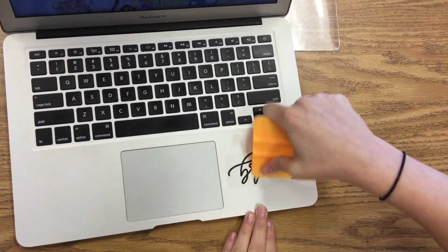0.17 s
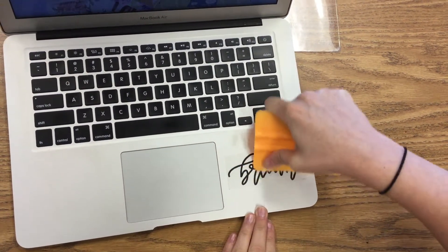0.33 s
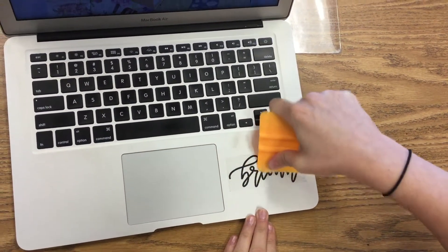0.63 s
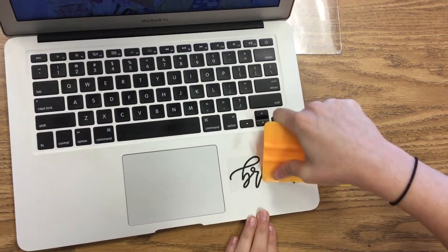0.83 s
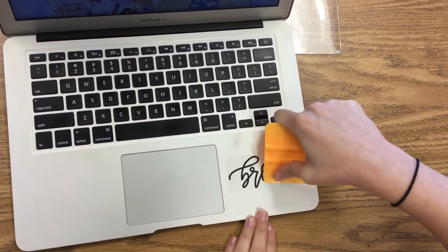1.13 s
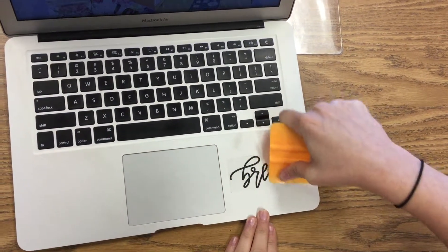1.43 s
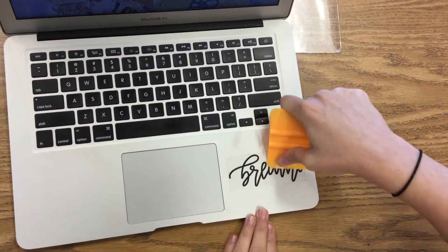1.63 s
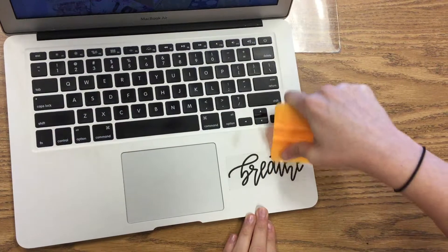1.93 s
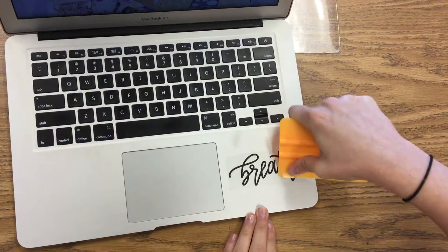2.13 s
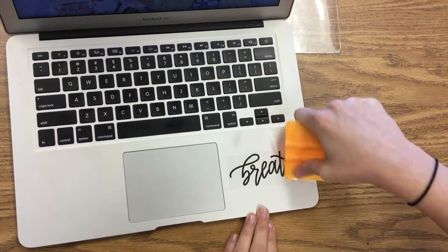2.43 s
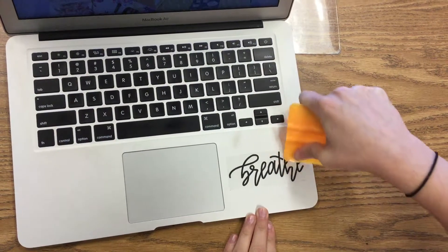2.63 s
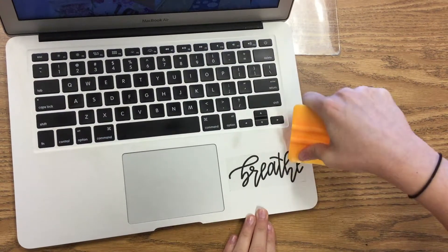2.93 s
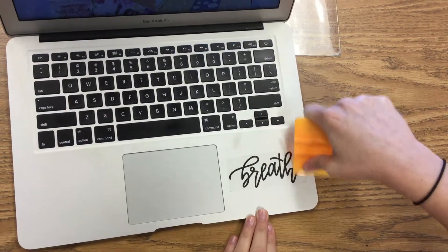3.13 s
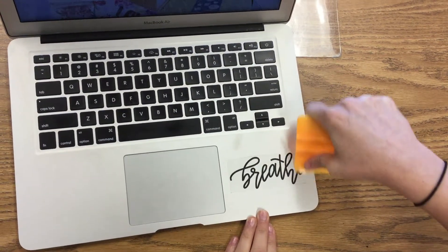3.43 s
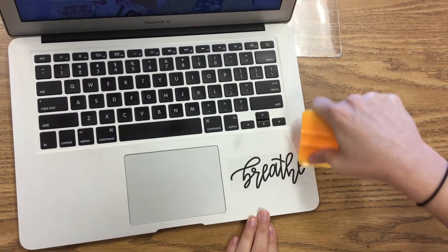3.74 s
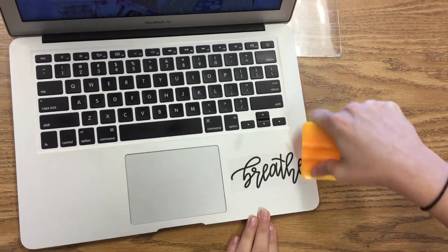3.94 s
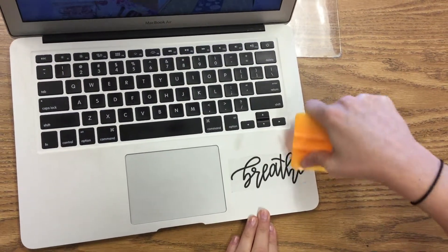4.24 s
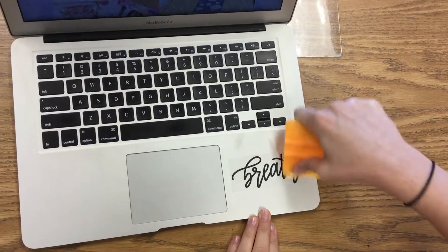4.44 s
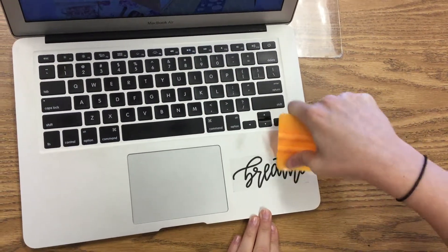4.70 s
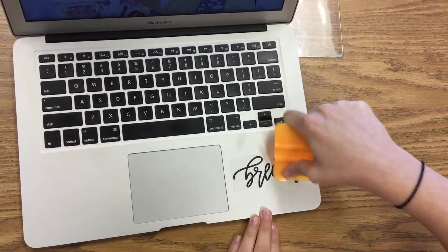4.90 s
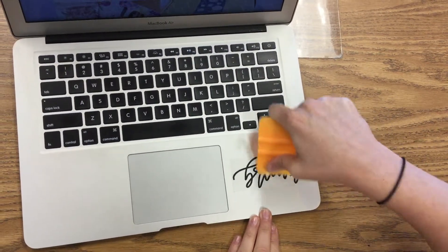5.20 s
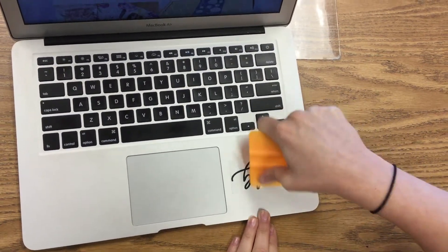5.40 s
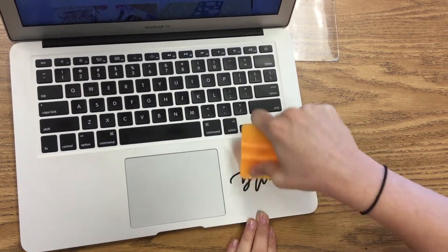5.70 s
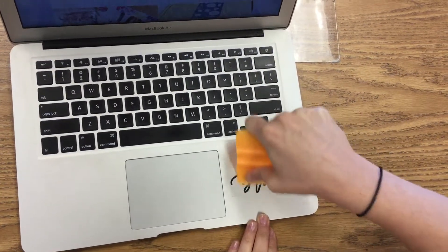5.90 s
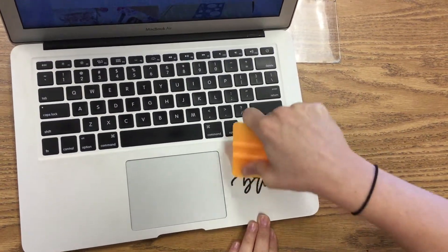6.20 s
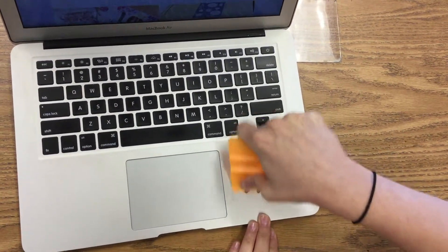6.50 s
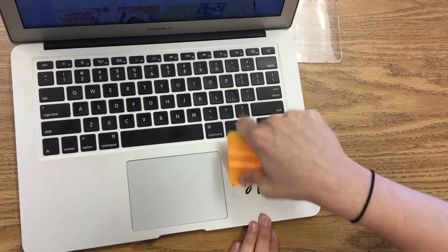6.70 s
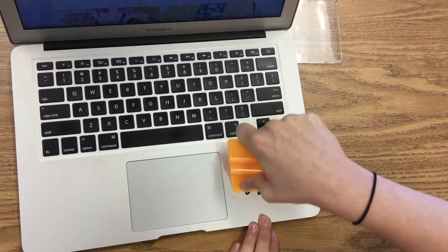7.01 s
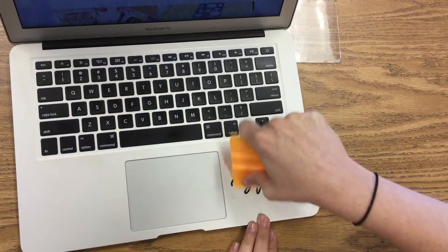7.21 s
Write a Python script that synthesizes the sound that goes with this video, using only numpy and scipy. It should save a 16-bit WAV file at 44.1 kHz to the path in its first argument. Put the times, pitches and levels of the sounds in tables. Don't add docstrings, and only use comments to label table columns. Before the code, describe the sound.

In a small room with low, wavering ventilation rumble, a plastic card edge rubs tape on a laptop's metal case. Short dry swishes alternate back and forth. Early on, most return strokes rock the case into a hollow knock on the desk, and the tape ticks occasionally. Later the knocks fade away and the scraping grows quicker and harsher. A single microphone hangs close above the desk.

```python
import sys
import numpy as np
from scipy import signal
from scipy.fft import rfft, irfft
from scipy.io import wavfile
from scipy.ndimage import uniform_filter1d

SR = 44100
rng = np.random.default_rng(int(sys.argv[2]) if len(sys.argv) > 2 else 0)


def how_loud(loudness_db):
    steps = np.asarray(loudness_db, float) / 20
    return 10 ** steps


def digitize_waveform(pressure):
    field = np.atleast_2d(pressure).T
    bounded = np.clip(field, -1, 1)
    quanta = np.round(bounded * 32767).astype(np.int16)
    wavfile.write(sys.argv[1], SR, quanta)


N = 324128

PAD_S = .014
LONGEST = SR // 6


def level(x, db):
    return x * how_loud(db) / np.sqrt(np.mean(x ** 2))


def band(x, hz, width_hz):
    b, a = signal.iirpeak(min(hz, .45 * SR), hz / width_hz, fs=SR)
    return signal.lfilter(b, a, x)


def lowpass(x, hz):
    b, a = signal.butter(1, hz, fs=SR)
    return signal.lfilter(b, a, x)


def decay(t, t60_s):
    return how_loud(-60 * t / t60_s)


def add(out, start_s, x):
    i = int(start_s * SR)
    out[max(i, 0):i + len(x)] += x[max(-i, 0):N - i]


def walk(size, rate_hz):
    hold = int(SR / rate_hz)
    steps = np.repeat(rng.standard_normal(size // hold + 1), hold)
    return 1.75 * uniform_filter1d(uniform_filter1d(steps, hold), hold)[:size]


def coloured(spectrum):
    hz, db = np.transpose(spectrum)
    bins_hz = np.arange(1, N // 2 + 2) * SR / N
    gain = how_loud(np.interp(np.log(bins_hz), np.log(hz), db, -90, -90))
    return irfft(rfft(rng.standard_normal(N)) * gain, N)


def ventilation():
    # (frequency [Hz], width [Hz], level [dB])
    room_modes = [(53.7, 8.7, -2), (71.1, 11.8, -0.5), (103.95, 17.7, 1), (127.4, 18.3, 0.5),
                  (152.2, 16.2, -6), (184.4, 19, -4.5), (215.6, 16.2, -8), (256, 21, -14), (299, 27.5, -18),
                  (345.3, 25.3, -22.5), (367.4, 23, -26.5)]
    # (time [s], level [dB])
    swell = [(0.0, -48.5), (1.0, -52.5), (1.06, -47.5), (1.35, -52), (1.39, -45.5), (1.62, -53),
             (1.68, -48), (2.03, -52), (2.41, -50), (4.65, -49), (4.83, -53), (5.32, -50), (6.9, -51),
             (6.96, -55), (7.1, -48), (7.35, -49.5)]
    # (frequency [Hz], density [dB per Hz])
    air_spectrum = [(240, -31), (400, 3), (473, -2), (653, 2.5), (874, -4.5), (1450, -7.5), (1910, -16.5),
                    (2230, -15), (3120, -19), (4370, -17), (6920, -24), (8310, -21.5), (10100, -24),
                    (15600, -27.5)]
    rumble = np.zeros(N)
    for hz, width_hz, db in room_modes:
        once = band(rng.standard_normal(N), hz, 1.56 * width_hz)
        mode = level(band(once, hz, 1.56 * width_hz), db)
        rumble += mode * np.sqrt(width_hz / 15) * how_loud(1.37 * walk(N, 7))
    swell_db = np.interp(np.arange(N) / SR, *np.transpose(swell))
    rumble = level(rumble, 0) * how_loud(uniform_filter1d(swell_db, size=SR // 15) + 1.33)
    air = level(coloured(air_spectrum), -72.5)
    drone = lowpass(air, 900)
    hiss = air - drone
    return rumble + drone * how_loud(1.3 * walk(N, 9)) + hiss * how_loud(.7 * walk(N, 5))


def slips(size, lean, sharp):
    warp = np.log(.5) / np.log(np.clip(lean, .15, .85))
    speed = np.sin(np.pi * np.linspace(0, 1, size) ** warp).clip(0)
    grit_db = 1.8 * rng.exponential(size=LONGEST) + 0.86 * walk(LONGEST, 107.6)
    grit = rng.standard_normal(LONGEST) * how_loud(grit_db)
    return grit[:size] * np.tanh(0.54 * speed) ** sharp


def resonate(drive, modes, patchy_db=2.5):
    out = np.zeros(len(drive))
    for k, (hz, width_hz, db) in enumerate(modes):
        once = band(drive, hz * (1 + 0.016 * rng.standard_normal()), width_hz)
        steep = band(once, hz, 4.2 * width_hz)
        patchy = how_loud(db + patchy_db * walk(LONGEST, 48.1)[:len(drive)])
        out += (-1) ** k * steep * patchy / np.sqrt(width_hz / 400)
    return out


def stroke(start_s, end_s, db, lean, bright_db, hiss_db):
    # (until [s], modes (frequency [Hz], width [Hz], level [dB]))
    spots = [
        (1.9, [(3170, 450, -2.5), (3940, 400, 2.5), (4450, 300, 1), (5800, 420, 1), (7100, 600, -3), (8200, 500, 3), (9200, 600, -1), (11700, 1200, 6), (13200, 1200, -1), (14800, 1500, 5)]),
        (4.35, [(3560, 780, 9), (4480, 100, 3.5), (4920, 290, 3), (6240, 880, 3), (8230, 760, 3), (11650, 1300, 2.5), (12960, 440, -2.5), (14500, 1100, 4), (15100, 910, 1)]),
        (5.6, [(3150, 690, -2), (4320, 370, 2), (4900, 290, -7.5), (5550, 960, 0.5), (7400, 580, -3), (8300, 260, -2.5), (9100, 450, -2), (11600, 1500, -2), (14600, 2000, -0.5)]),
        (7.4, [(3320, 760, -2), (3670, 420, 3), (4350, 750, -4.5), (5250, 380, -2.5), (5730, 650, -3), (7300, 570, -5), (9140, 850, -2), (11650, 990, -5.5), (13100, 800, -9.5), (15300, 1100, -9)]),
    ]
    bright_above_hz, hiss_above_hz = 4700, 6900
    size = min(int((end_s - start_s + 2 * PAD_S) * SR), LONGEST)
    modes = next(spot for until_s, spot in spots if start_s < until_s)
    card = [(hz, width_hz, mode_db + (bright_db + 1.5) * (hz > bright_above_hz))
            for hz, width_hz, mode_db in modes if hz < hiss_above_hz]
    edge = [mode for mode in modes if mode[0] > hiss_above_hz]
    lean = .5 + 1.43 * (lean - .5)
    scrape = level(resonate(slips(size, lean, 1.14), card), db + 0.25)
    hiss = level(resonate(slips(size, lean + 0.0065, 1.25), edge), db + hiss_db)
    return scrape + hiss


def groan(start_s, end_s, db, hz, deep_db, lean):
    # (frequency [Hz], width [Hz], level [dB])
    panels = [(1730, 160, -10.5), (2150, 220, -4.5), (2500, 330, -8.5), (2840, 160, -9)]
    # (frequency [Hz], width [Hz], level [dB])
    deep_panels = [(1020, 150, -1.5), (1260, 420, -0.2), (1634, 290, -0.3)]
    size = min(int((end_s - start_s + PAD_S) * SR), LONGEST)
    under = resonate(slips(size, lean - .01, 1.0), [(hz, 140, 0)])
    others = resonate(slips(size, lean + 0.014, 0.7), panels)
    deep = resonate(slips(size, lean + .03, 0.48), deep_panels, patchy_db=4.0)
    return level(under, db - 4.0) + level(others, db - 4.5) + level(deep, db + deep_db + 0.11)


def sheet(x):
    t60_s, ring_db = 0.02, -4.0
    t = np.arange(N) / SR
    tail = rng.standard_normal(N) * how_loud(-60 * np.minimum(t / t60_s, 3))
    response = 1 + rfft(tail * how_loud(ring_db) / np.sqrt(np.sum(tail ** 2)))
    broad = uniform_filter1d(np.abs(response) ** 2, size=300 * N // SR)
    return irfft(rfft(x) * response / np.sqrt(broad), N)


def rubbing():
    # (start [s], end [s], level [dB],
    # brightness [dB], edge hiss share [dB])
    catches = [
        (5.68, 5.702, -55, -5, -4.5),
        (5.721, 5.737, -59.5, -7, -5.5),
        (4.891, 4.909, -69.5, 1, -3),
        (1.998, 2.014, -72, -16, 6),
        (7.266, 7.284, -67.5, -3, -16),
        (2.445, 2.5, -68, -9, -12),
        (1.846, 1.864, -75, -7, -10),
        (0, 0.0089, -72.5, -8, -7),
        (5.389, 5.408, -70, -10, -16),
    ]
    # (start [s], end [s], level [dB], hum over scrape [dB])
    pushes = [(0.074, 0.121, -73, 3), (0.329, 0.416, -73, 6.5), (0.646, .709, -70.5, 5),
              (0.973, 1.042, -83, 9.5), (1.266, 1.325, -73.5, 5.5), (1.598, 1.663, -71.5, 1.5),
              (1.97, 2.017, -68.5, -2.5), (2.264, 2.311, -71.5, -5), (2.599, 2.648, -67.5, -4),
              (2.911, 2.962, -72, -5), (3.22, 3.261, -70, -2), (3.483, 3.534, -77, -2),
              (3.766, 3.832, -72.5, -3.5), (4.027, 4.082, -73.5, -3), (4.241, 4.33, -82, 0.5),
              (4.477, 4.541, -70.5, -2), (4.751, 4.792, -80, -1.5), (4.982, 5.045, -76.5, 1),
              (5.231, 5.306, -78.5, 2.5), (5.473, 5.547, -72, 0.7), (5.717, 5.779, -65, -2.5),
              (5.964, 6.041, -74, -1.5), (6.2, 6.258, -66.5, -4.5), (6.424, 6.477, -70, 0),
              (6.632, 6.703, -72, -2.1), (6.883, 6.946, -68.5, -3.5), (7.14, 7.181, -73.5, -2)]
    # (start [s], end [s], level [dB], hum over scrape [dB])
    pulls = [(.216, .295, -71.5, 5.5), (.502, .569, -68, 6), (.822, .876, -75, 8.5),
             (1.143, 1.197, -72.5, 6), (1.443, 1.515, -72, 6), (1.78, 1.852, -76, 6),
             (2.064, 2.184, -74.5, 1.5), (2.408, 2.51, -74, 1.5), (2.734, 2.803, -71.5, -1.1),
             (3.058, 3.121, -69.5, .6), (3.344, 3.415, -70, -1.7), (3.635, 3.688, -76.5, 3),
             (3.901, 3.959, -67.5, -1.8), (4.151, 4.213, -68.5, -0.5), (4.408, 4.464, -62.5, -8),
             (4.642, 4.672, -76, 2), (4.895, 4.947, -66.5, .6), (5.148, 5.2, -70.5, 4),
             (5.392, 5.444, -61.5, -1.5), (5.637, 5.683, -60.5, -5.5), (5.876, 5.921, -69.5, -1.4),
             (6.093, 6.161, -64, -1.5), (6.316, 6.379, -65.5, -2), (6.541, 6.599, -63, -3.5),
             (6.771, 6.825, -65.5, 0), (7.007, 7.063, -66, .6), (7.269, 7.314, -66.5, -3.5)]
    # (until [s], brightness [dB], edge hiss share [dB], panel under card [Hz], deep share [dB])
    grips = [(.3, -4, -6, 1900, -2.5), (1.1, -2, -3.5, 2083, -4.5), (1.55, 0, -5.5, 2150, -7),
             (2.35, -5, -4.5, 2030, -11.5), (3.7, 3, -2.5, 2430, -7.5), (4.35, 0.7, 0.3, 2440, -5.5),
             (5.6, -0.5, -7.5, 2150, -9), (5.85, -3, -9.5, 2030, -6.5), (6.5, -3, -10, 2730, -5),
             (6.85, -3.5, -9, 2140, -4.5), (7.4, -0.5, -10, 2680, -5)]
    # (time [s], share of the stroke [1])
    pull_leans = [(0, 0.58), (1.45, 0.57), (2.4, 0.52), (2.7, .46), (3.1, 0.38), (3.6, 0.61), (3.9, 0.43),
                  (4.4, 0.59), (5.2, 0.49), (5.6, 0.55), (6.8, 0.59), (7.05, 0.56), (7.3, 0.46)]
    push_lean, catch_lean = 0.54, .38
    push_bright_db, push_hiss_db, push_deep_db = 0.6, 1.3, -0.1
    hiss_per_hum, deep_per_hum = -0.15, -0.58
    hum_lead_s, hum_lag_s = .007, 0.0064
    out = np.zeros(N)
    for push, rows in enumerate((pulls, pushes)):
        for start_s, end_s, db, hum_db in rows:
            _, bright_db, hiss_db, hz, deep_db = next(grip for grip in grips if start_s < grip[0])
            lean = push_lean if push else np.interp(start_s, *np.transpose(pull_leans))
            bright_db += push * push_bright_db
            hiss_db += push * push_hiss_db + hiss_per_hum * hum_db
            deep_db += push * push_deep_db + deep_per_hum * hum_db
            add(out, start_s - PAD_S, stroke(start_s, end_s, db, lean, bright_db, hiss_db))
            hum = groan(start_s - hum_lead_s, end_s + hum_lag_s, db + hum_db, hz, deep_db, lean)
            add(out, start_s - hum_lead_s - PAD_S / 2, hum)
    for start_s, end_s, db, bright_db, hiss_db in catches:
        add(out, start_s, stroke(start_s + PAD_S, end_s - PAD_S, db, catch_lean, bright_db, hiss_db))
    return sheet(out)


def ring(modes, t, detune):
    return sum(sign * how_loud(db) * decay(t, t60_s) * np.sin(2 * np.pi * hz * detune * t)
               for hz, db, t60_s, sign in modes)


def knocks():
    # (time [s], peak [dB], sharp tap share [dB], buzz share [dB])
    hits = [(.2024, -47.5, -19, -16), (.4887, -46, -19, -16), (.7711, -44, -19, -16),
            (1.052, -43, -18, -16), (1.3408, -38.5, -15.5, -16), (1.6387, -39, -14.5, -16),
            (1.9541, -43, -17, -16), (2.2761, -45, -13, -17), (2.6171, -46.5, -11.5, -22),
            (2.9504, -46.5, -14, -20), (3.2596, -44, -14, -21), (3.5732, -47.5, -18, -19),
            (3.8785, -47, -18, -20), (4.1758, -48, -14, -21), (5.1263, -54.5, -21, -20)]
    # (frequency [Hz], level [dB], t60 [s], signed gain [1])
    case_modes = [(587, -14.5, 0.52, 0.76), (869, -12.5, 0.089, -1.2), (1232, -4.5, 0.057, -1.05),
                  (1350, -5.5, 0.24, 0.4), (1473, 3.5, 0.26, 1), (1656, -12, 0.07, -0.68)]
    # (frequency [Hz], level [dB], t60 [s], signed gain [1])
    tap_modes = [(2500, 2, 0.022, 0.97), (3500, -18, 0.089, -1.1), (4000, -7, .04, 0.35),
                 (4320, -15, 0.14, -0.67), (4500, -34, 0.071, 1), (4780, -19.5, 0.14, -1)]
    lead_s, rise_s, tap_rise_s = .0025, .003, .0004
    free_s, held_db = .012, -27
    out, t = np.zeros(N), np.arange(SR // 5) / SR
    held = how_loud(held_db / (1 + np.exp(np.clip((free_s - t) / .0003, -50, 50))))
    rise = 1 - np.exp(-t / rise_s)
    tap_rise = 1 - np.exp(-t / tap_rise_s)
    for hit_s, db, tap_db, buzz_db in hits:
        detune = 1 + .003 * rng.standard_normal(2)
        tap = how_loud(tap_db + 9.0) * ring(tap_modes, t, detune[1]) * tap_rise
        struck = ring(case_modes, t, detune[0]) * rise + tap
        desk = band(band(rng.standard_normal(len(t)), 690, 410), 700, 1500)
        thud = level(desk, -16.0) * decay(t, 0.18) * rise
        loose = band(rng.standard_normal(len(t)), 1220, 600)
        buzz = level(1.7 * band(loose, 1230, 130) - band(loose, 1440, 170), buzz_db + .1)
        buzz = buzz * decay(t, 0.35) * (t > free_s)
        add(out, hit_s - lead_s, how_loud(db - 3.3) * (held * struck + thud + buzz))
    return out


def ticks():
    # (time [s], peak [dB], pitch [Hz], width [Hz], t60 [s])
    cracks = [(.595, -63, 11000, 9000, 0.0065), (1.3624, -61, 9200, 900, 0.014),
              (1.382, -62, 4800, 2500, 0.0096), (1.396, -56, 780, 700, 0.034),
              (1.3955, -60, 2400, 400, 0.12), (1.5355, -59, 12100, 9000, .006),
              (1.862, -58, 11000, 9000, 0.0066), (2.004, -61, 8200, 1500, .012),
              (4.281, -68, 9000, 9000, .006), (5.4766, -63, 11000, 9000, .006),
              (5.677, -50.5, 1010, 400, 0.065), (7.0869, -61, 11000, 8900, .006),
              (7.34, -70, 11100, 9000, .006)]
    out, t = np.zeros(N), np.arange(SR // 10) / SR
    for crack_s, db, hz, width_hz, t60_s in cracks:
        snap = rng.standard_normal(len(t)) * decay(t, t60_s)
        crack = band(band(snap, hz, width_hz), hz, min(3 * width_hz, .4 * SR))
        add(out, crack_s, crack * how_loud(db) / np.abs(crack).max())
    return out


def room(x):
    t60_s, echo_db, gap_s, top_hz = .3, -25, .009, 3500
    t = np.arange(SR // 2) / SR
    tail = lowpass(rng.standard_normal(len(t)) * decay(t, t60_s) * (t > gap_s), top_hz)
    return signal.fftconvolve(x, tail * how_loud(echo_db) / np.sqrt(np.sum(tail ** 2)))[:N]


def scene():
    air = ventilation()
    rub = rubbing()
    hits = knocks() + ticks()
    return (air + rub + hits + room(hits + how_loud(-4.0) * rub))[None]


def low_pass(x):
    return signal.sosfilt(signal.butter(12, 15730, fs=SR, output="sos"), x)


def record(dry):
    return low_pass(dry)


dry = scene()
out = record(dry)
digitize_waveform(out)
```